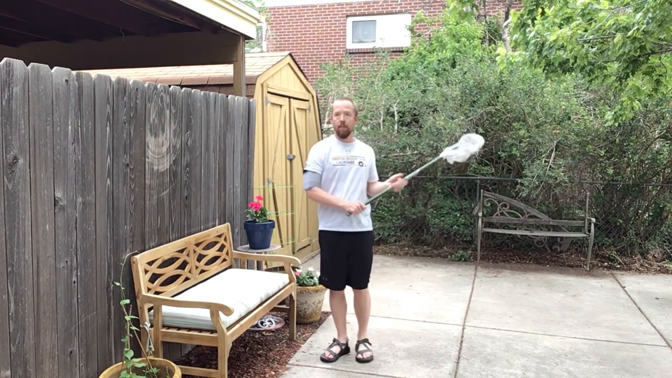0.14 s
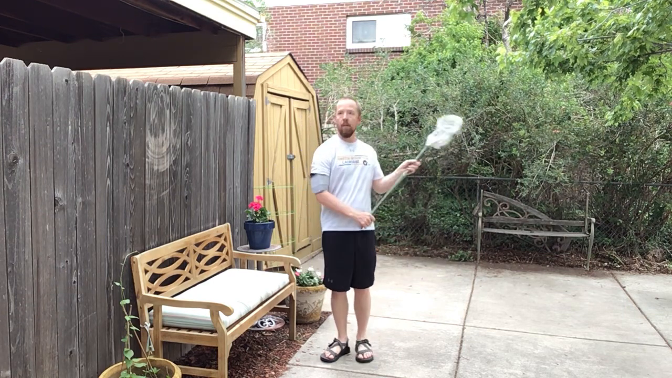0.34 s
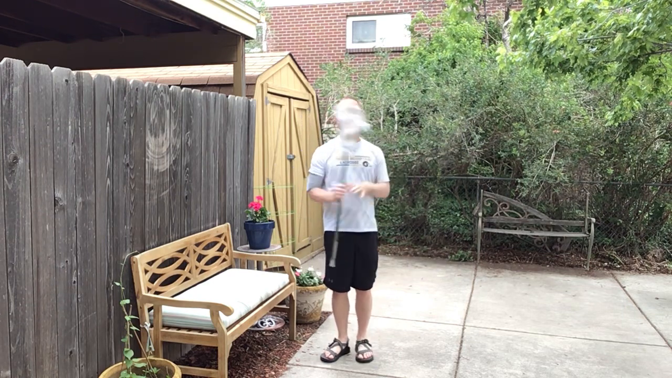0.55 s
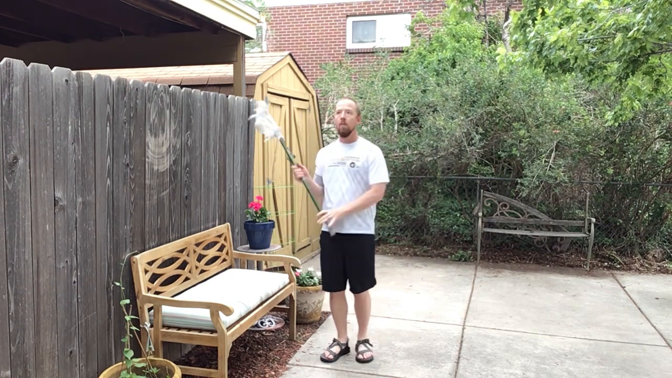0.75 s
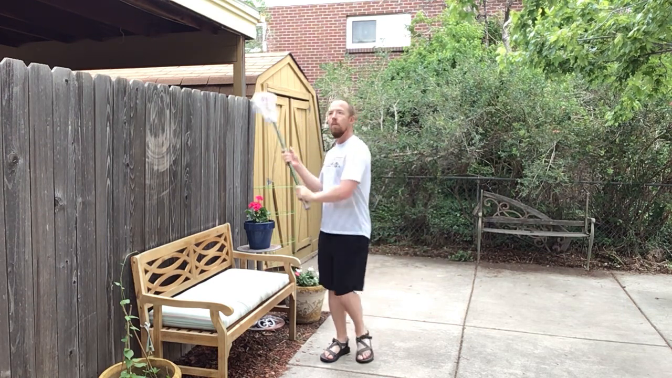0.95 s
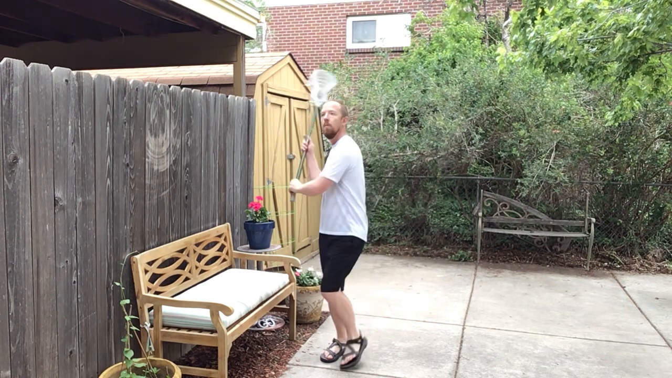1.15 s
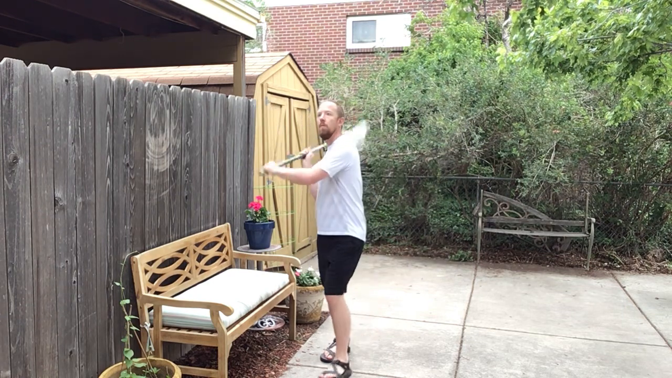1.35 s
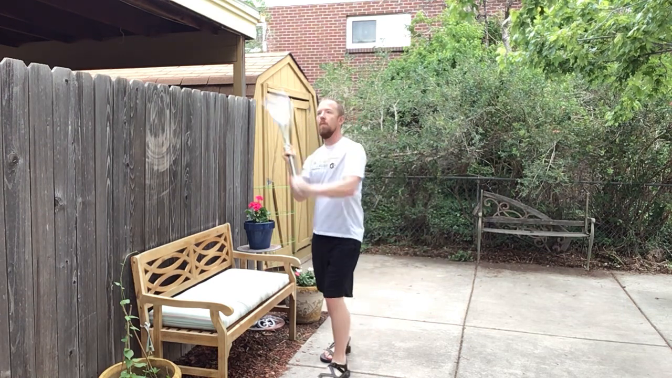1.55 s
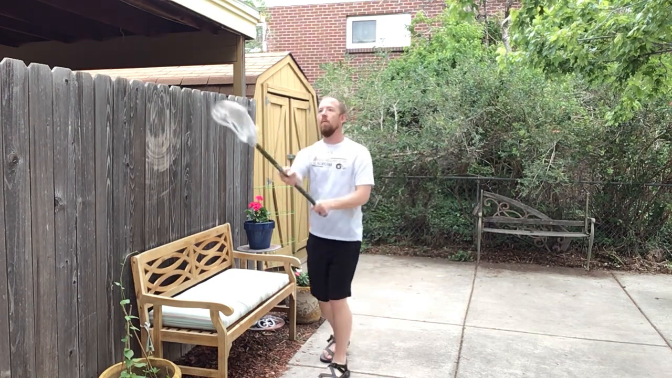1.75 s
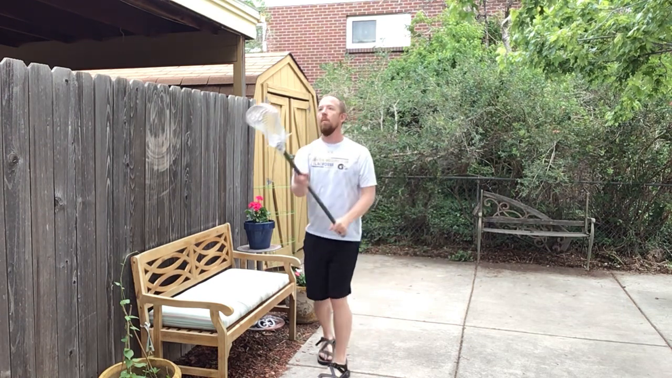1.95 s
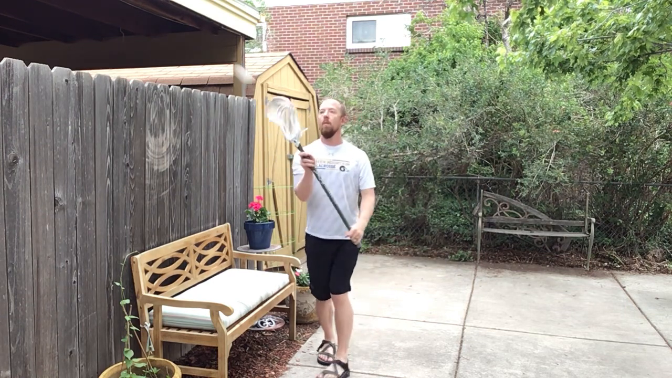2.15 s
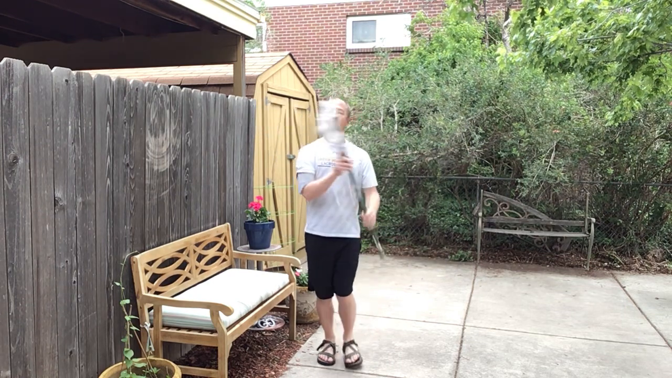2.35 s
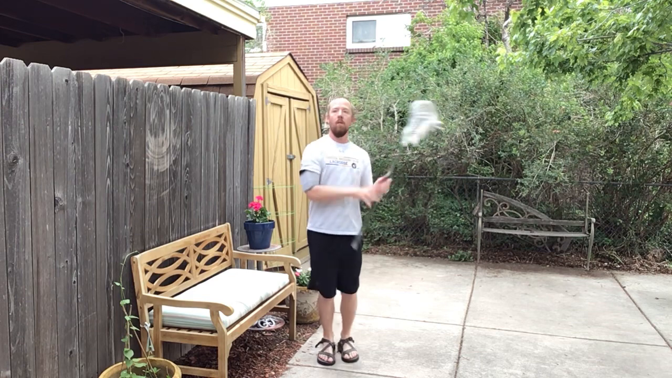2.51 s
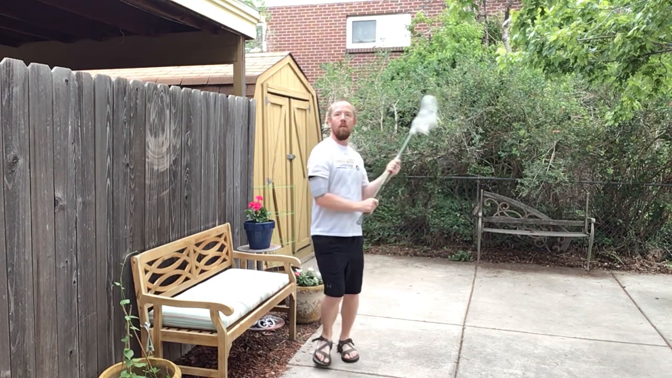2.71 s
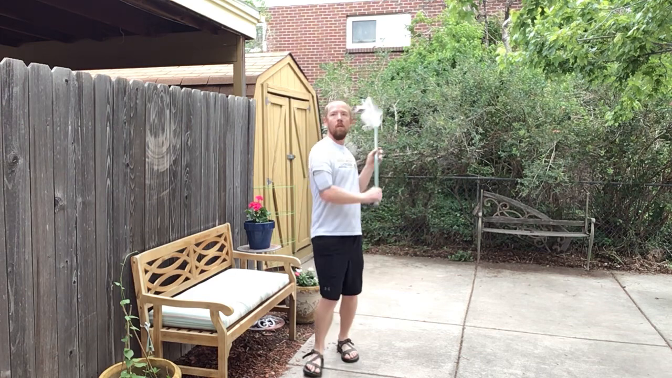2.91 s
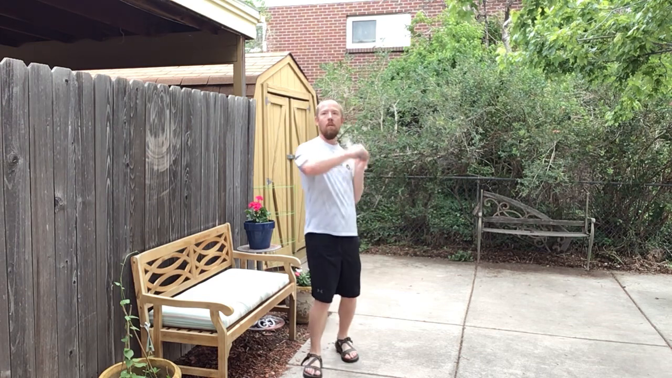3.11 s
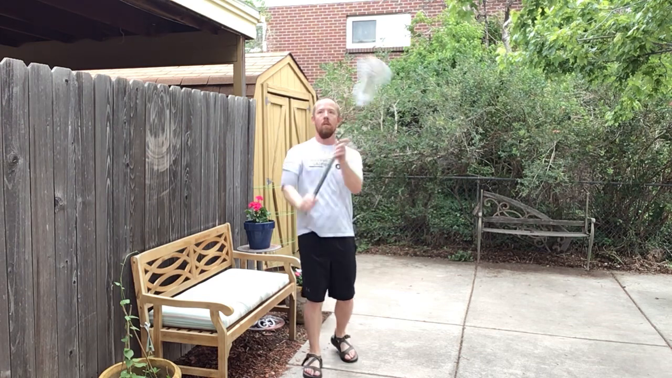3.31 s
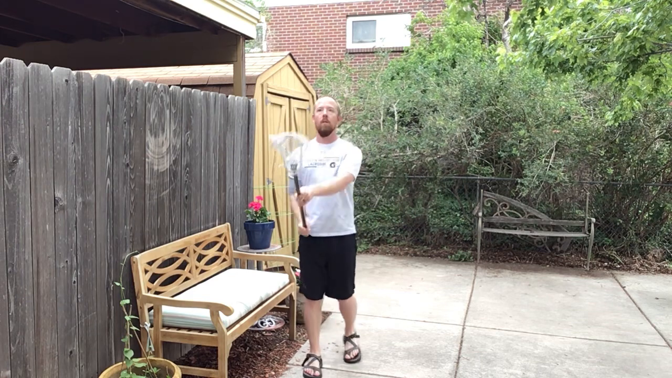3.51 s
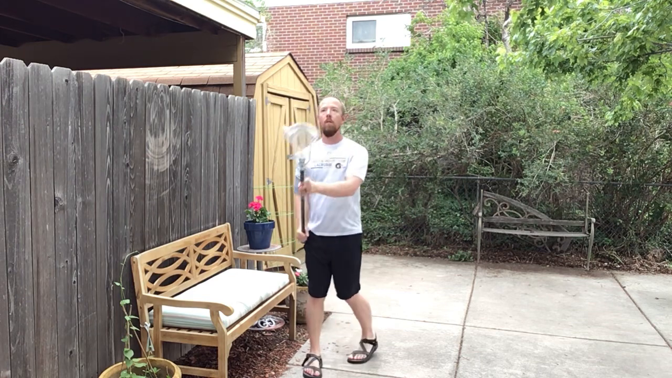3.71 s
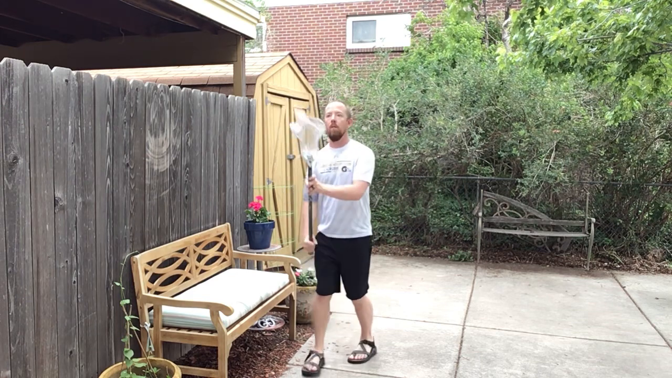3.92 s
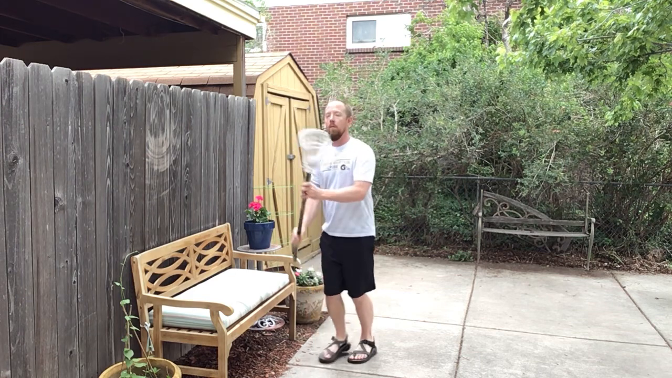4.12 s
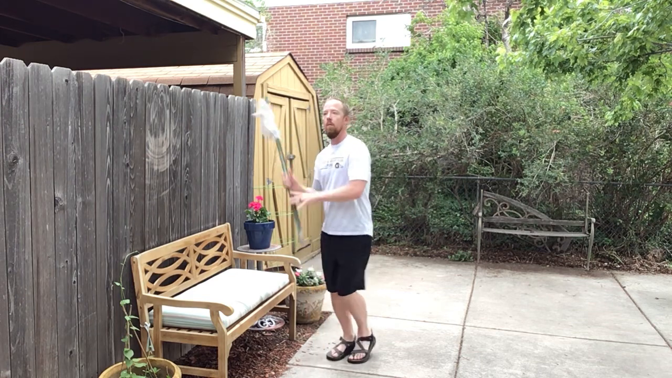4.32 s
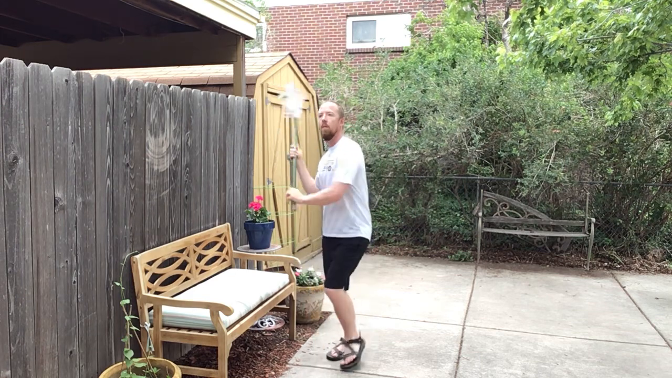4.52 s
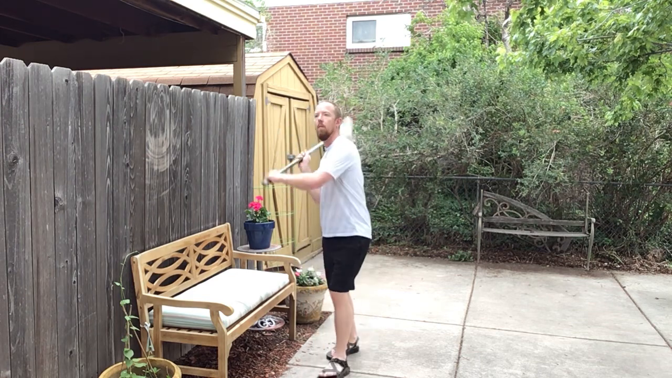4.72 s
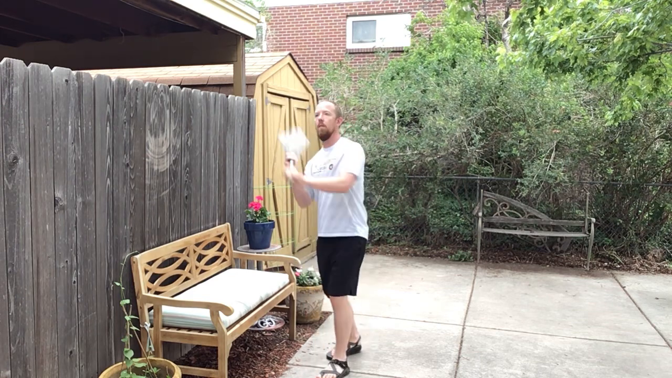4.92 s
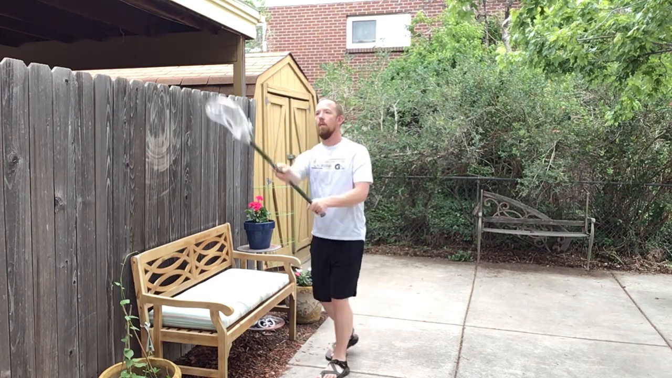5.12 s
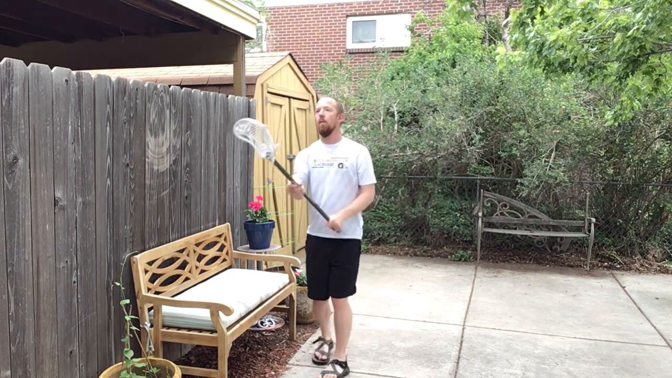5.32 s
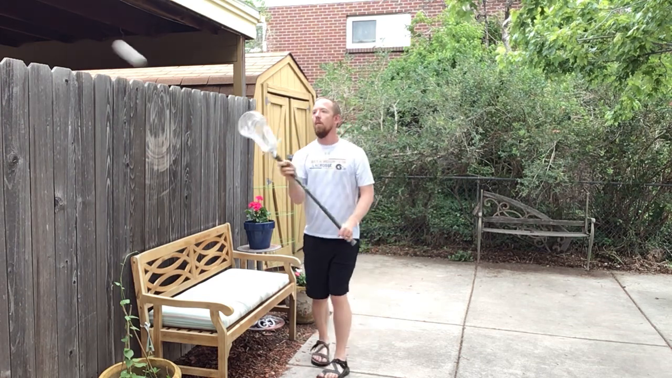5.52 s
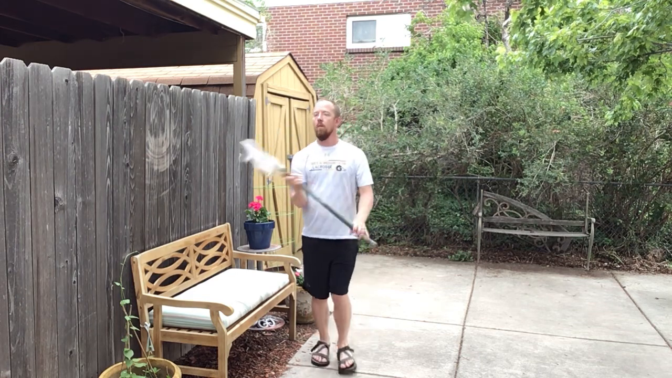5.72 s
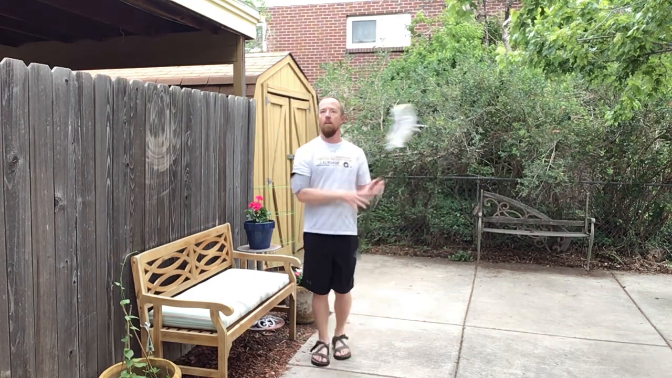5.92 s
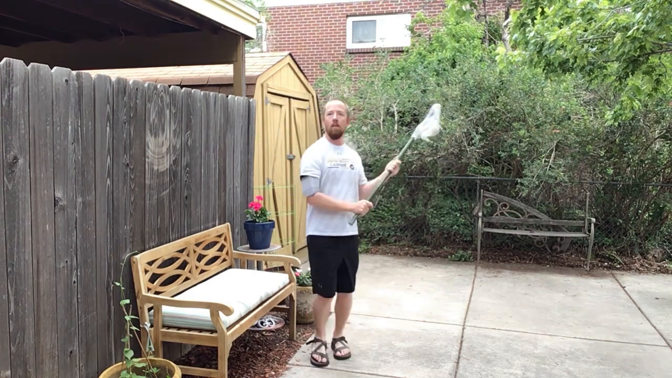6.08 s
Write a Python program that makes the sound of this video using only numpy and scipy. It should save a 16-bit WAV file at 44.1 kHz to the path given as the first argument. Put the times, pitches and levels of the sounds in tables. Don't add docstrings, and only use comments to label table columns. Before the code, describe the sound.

Three evenly spaced ball smacks on hollow wooden boards ring out in a yard, between soft net rattles, faint swishes and distant town rumble.

```python
import sys
import numpy as np
from scipy import signal
from scipy.fft import rfft, irfft
from scipy.io import wavfile

SR = 44100
rng = np.random.default_rng(int(sys.argv[2]) if len(sys.argv) > 2 else 0)


def persist_wave(psi):
    counts = np.round(np.clip(psi, -1, 1) * 32767).astype(np.int16)
    wavfile.write(sys.argv[1], SR, np.atleast_2d(counts).T)


def natural_amplitude(level_db):
    exponent = np.asarray(level_db, float) / 20
    return 10 ** exponent


N = 271215

# start in seconds, delay of the strongest push in seconds, lag of the bass in seconds,
# yard tail level in dB, tail tilt in dB per octave.
WALL_HITS = [
    (1.885, 0.011, 0.013, -45, -1.2),
    (3.623, 0.015, 0.0221, -46.5, 0.7),
    (5.302, 0.00956, 0.0226, -48, -0.24),
]
# pitch in Hz, T60 in seconds,
# then level in dB at hits 1, 2 and 3.
FRAME_MODES = [(70, 0.92, -14, -16, -13), (81.7, 0.48, -29, -6.5, -16), (95, 0.18, 2.5, -3, 6.5),
               (110.3, 0.55, -14.5, -8, -9), (118.6, 0.96, -20, -15, -21.5), (129.3, 0.37, -8.5, 1, -2.5),
               (152, 0.44, 7.5, 4.5, 9), (174, 0.29, -11, 3, -3)]
# pitch in Hz, T60 in seconds, then level in dB at hits 1, 2 and 3.
BOARD_MODES = [(184, 0.3, 8, 4.5, 4.5), (216.6, 0.49, -26, -26, -12), (232, 0.34, -10, -0.5, 2),
               (240.2, 0.25, 6.5, -8, -14), (257.1, 0.3, 2.5, -3.5, -19), (283.1, 0.29, 1.5, 4.5, 1.5),
               (298, 0.24, -14, -3.5, -10), (335.3, 0.33, -27, -22, -17.5), (348.6, 0.32, -6.5, -1, -9.5),
               (340, 0.088, -25, -23, -31),
               (396.5, 0.293, -12, -12.5, -10), (405, .25, -25, -20, -34), (407, 0.075, -22, -26, -32),
                (443, 0.5, -28, -25, -35), (480.5, 0.2, -24, -14, -36), (508.6, 0.2, -25, -24, -17.5),
                (554, 0.093, -20.5, -26, -18), (567, 0.25, -32, -30, -32), (592, 0.34, -24, -28, -28),
                (632, 0.24, -32, -47, -33), (697, 0.21, -31, -26, -28)]
# delay in seconds, level in dB.
YARD_ECHOES = [(.036, -6.5), (.069, -15.5)]
# start in seconds, peak in dB,
# low edge in Hz, high edge in Hz.
SLAP_CRACKS = [(1.8858, -37, 2500, 15000), (1.8872, -38, 700, 8000), (1.8903, -45, 8000, 15000),
               (1.8943, -46, 2000, 15000), (3.6242, -26, 6500, 12500), (3.6261, -29, 900, 6000),
               (3.6264, -35, 6000, 15000), (3.6293, -38, 8000, 15000), (3.6348, -41, 1800, 7000),
               (3.6378, -43, 2000, 8000), (5.3023, -36, 2000, 15000), (5.3035, -33, 7500, 14500),
               (5.3065, -35, 1500, 9000), (5.304, -36, 1200, 4500), (5.3112, -43, 2000, 15000)]
# frequency in Hz, level in dB per Hz.
TAIL_SPECTRUM = [(290, -27), (500, -3), (1200, -18), (1510, -19), (2950, -23), (3260, -26), (3820, -26),
                 (5860, -29), (15300, -26)]
# frequency in Hz, T60 in seconds.
TAIL_DECAY = [(500, 0.34), (800, 0.43), (1200, 0.38), (2000, 0.19), (2900, 0.24), (7700, 0.34),
              (15000, 0.16)]
# start in seconds, rms in dB, T60 in seconds.
MESH_RUBS = [(.065, -69, .05), (.765, -71, .07), (1.621, -65.5, 0.076), (1.70, -75, .06),
             (2.22, -60.5, 0.16), (2.426, -63, 0.18), (3.968, -57.5, 0.11), (3.995, -50, .07),
             (4.014, -54.5, .15), (4.294, -58.5, .11), (4.868, -68, .06), (4.889, -66, .13),
             (5.661, -61, 0.058), (5.667, -54, 0.062), (5.674, -60.5, 0.15), (5.903, -62.5, 0.1),
             (6.072, -66, .065)]
# start in seconds, peak in dB, pitch in Hz.
DULL_KNOCKS = [(1.887, -38, 580), (2.222, -52, 4300), (2.369, -59, 4040), (2.427, -58, 5000),
               (3.6258, -34.5, 540), (3.968, -43, 2480), (3.9705, -48, 2330), (3.971, -45, 510),
               (3.974, -41, 1400), (3.985, -43.5, 786), (3.995, -44, 7000), (3.998, -37, 5800),
               (4.015, -39, 6500), (4.019, -47, 8000), (4.167, -53, 3800), (4.294, -58, 6400),
               (4.295, -47, 400), (5.303, -45, 840), (5.668, -52, 930), (5.668, -42, 3580),
               (5.69, -45, 178), (5.889, -50, 520), (5.890, -52, 1000)]
# start in seconds, peak in dB, pitch in Hz.
HEAD_RINGS = [(.309, -60, 4470), (.32, -64, 3800), (2.371, -52, 4490), (2.38, -66, 3900),
              (4.297, -60, 4450), (5.672, -48, 4210)]
# moment of full speed in seconds, rms in dB,
# time speeding up in seconds, time held in seconds.
AIR_STROKES = [(.294, -79, .2, .005), (.46, -75, 0.096, .075), (2.07, -79, .2, .02), (2.3, -80, .1, .08),
               (2.44, -73, .2, .005), (2.566, -76, .03, .03), (4.0, -70, 0.075, 0.033),
               (4.2, -72, 0.33, 0.016), (4.3, -81, .015, 0.13), (5.514, -78, .25, .01),
               (5.69, -78, .04, .23), (6.018, -78, .03, .02)]
# start in seconds, rms in dB.
STRING_WHISTLES = [(1.965, -77), (2.32, -82), (4.1, -75), (5.79, -80)]
# start in seconds, rms in dB, centre in Hz, T60 in seconds.
BRIEF_SCUFFS = [(.059, -61, 1900, .054), (.307, -69, 4380, .05), (1.012, -69, 6000, 0.11),
                (1.025, -67, 1700, .05), (1.123, -65, 3300, .05), (1.545, -68.5, 4570, .06),
                (2.222, -63.5, 2400, .1), (2.233, -59.5, 1300, 0.047), (2.428, -61, 4200, 0.18),
                (2.444, -60, 2000, .09), (3.078, -65, 3000, 0.056), (3.14, -72, 2600, .08),
                (3.967, -52.5, 2300, .08), (3.968, -54.5, 726, 0.18), (4.165, -63, 3970, 0.15),
                (4.168, -59.5, 724, .043), (4.181, -63, 3900, .15), (4.204, -63.5, 3260, .06),
                (5.004, -64.5, 5400, .07), (5.552, -62, 2300, 0.075), (5.566, -62, 2480, 0.13),
                (5.666, -55.5, 590, 0.063), (5.666, -58.5, 1710, .05), (5.68, -67.5, 3900, 0.28),
                (5.897, -61, 3320, 0.17)]
# start in seconds, rms in dB, centre in Hz, T60 in seconds.
SOLE_DRAGS = [(1.249, -69, 4100, 0.41), (1.36, -69.5, 2600, .15), (4.72, -74, 3480, 0.1),
              (4.85, -72, 2980, 0.6)]
# start in seconds, length in seconds, start pitch in Hz, end pitch in Hz, rms in dB.
BIRD_NOTES = [(0.197, .09, 7850, 7900, -91), (.37, 0.044, 3480, 3620, -88), (0.41, .1, 3680, 3600, -80.5),
              (0.518, .06, 3600, 3660, -87), (0.68, 0.055, 3440, 3580, -80),
              (0.732, 0.053, 3560, 3550, -83), (.79, 0.078, 3560, 3500, -87),
              (0.697, 0.123, 6900, 6800, -83), (.74, .04, 6600, 6600, -92)]
# frequency in Hz, level in dB per Hz.
TOWN_SPECTRUM = [(28, -34), (47, -5.5), (112, 0.5), (139, -8.5), (165, -1.5), (190, -9.5), (215, -1),
                 (242, -11), (280, -4), (309, -13.5), (443, -14.5), (735, -21.5), (791, -22), (3610, -32.5),
                 (15000, -43.5)]


def at_hz(points, hz):
    table = np.array(points)
    return np.interp(np.log(hz), np.log(table[:, 0]), table[:, 1])


def rms_one(x):
    return x / np.sqrt(np.mean(x ** 2) + 1e-20)


def add(out, s, piece):
    i = round(s * SR)
    out[i:i + len(piece)] += piece[:N - i]


def band(x, low_hz, high_hz):
    edges = [low_hz, min(high_hz, .45 * SR)]
    return signal.sosfilt(signal.butter(3, edges, "band", fs=SR, output="sos"), x)


def soften(x, hz):
    return signal.sosfilt(signal.butter(1, hz, fs=SR, output="sos"), x)


def below(x, hz):
    return signal.sosfilt(signal.cheby2(14, 60, hz, fs=SR, output="sos"), x)


def coloured(spectrum, size):
    hz = np.maximum(np.fft.rfftfreq(size, 1 / SR), 1)
    white = rfft(rng.standard_normal(size))
    return rms_one(irfft(white * natural_amplitude(at_hz(spectrum, hz)), size))


def drift(rate):
    knots = rng.standard_normal(N // 400)
    r = np.exp(-800 * np.pi * rate / SR)
    slow = signal.lfilter([1], [1, -2 * r, r * r], knots)
    return np.interp(np.arange(N) / 400, np.arange(len(slow)), rms_one(slow))


def grainy(size, spread_db):
    grain_db = spread_db * np.minimum(rng.exponential(1, size), 4)
    return rms_one(rng.standard_normal(size) * natural_amplitude(grain_db))


def burst(level_db, low_hz, high_hz, rise_s, t60):
    t = np.arange(SR // 4) / SR
    rise = np.minimum(t / max(rise_s, 1e-4), 1)
    decay = natural_amplitude(-60 * np.maximum(t - rise_s, 0) / t60)
    grains = rms_one(band(grainy(len(t), spread_db=5.0), low_hz, high_hz))
    return natural_amplitude(level_db) * rise * decay * grains


def boards():
    out, t = np.zeros(N), np.arange(SR // 2) / SR
    boom_db, frame_top_hz = -31.5, 176
    for k, (s, push_s, lag_s, _, _) in enumerate(WALL_HITS):
        boom = np.zeros(len(t))
        for hz, t60, *strike_db in FRAME_MODES + BOARD_MODES:
            turns = hz * (t - push_s) + lag_s * (np.sqrt(hz) - np.sqrt(250)) ** 2
            swell = 1 - np.exp(-(t * hz / 1.22) ** 2)
            swell *= np.sign(hz - frame_top_hz)
            level = natural_amplitude(boom_db + strike_db[k] - 60 * t / t60)
            boom -= level * swell * np.sin(2 * np.pi * turns)
        add(out, s, boom)
        for lag, echo_db in YARD_ECHOES:
            add(out, s + lag, natural_amplitude(echo_db) * boom)
    return out


def slaps():
    out, t = np.zeros(N), np.arange(300) / SR
    pulse = (t / .0003) * np.exp(-t / .0003)
    for s, peak_db, low_hz, high_hz in SLAP_CRACKS:
        crack = band(rng.standard_normal(len(t)) * pulse, low_hz, high_hz)
        add(out, s, natural_amplitude(peak_db - 1.0) * crack / np.abs(crack).max())
    return out


def yard_tail():
    out, t = np.zeros(N), np.arange(SR // 2) / SR
    edges = 450 * 2 ** np.arange(0, 5.6, .5)
    shape = (1 + 1.1 * np.exp(-t / 0.018)) * (1 - np.exp(-t / 0.00053))
    for s, _, _, tail_db, tilt_db in WALL_HITS:
        noise = coloured(TAIL_SPECTRUM, size=len(t)) * shape
        for low, high in zip(edges, edges[1:]):
            t60 = at_hz(TAIL_DECAY, np.sqrt(low * high))
            dying_db = tail_db + tilt_db * np.log2(low / 450) - 60 * t / t60
            add(out, s, band(noise, low, high) * natural_amplitude(dying_db))
    return out


def mesh_rubs():
    out = np.zeros(N)
    for s, db, t60 in MESH_RUBS:
        dull_hz = min(6570 * 2 ** ((db + 62) / 9.5), .45 * SR)
        grains = burst(db + 3, 2300, 14000, rise_s=0.0014, t60=t60)
        add(out, s, soften(grains, dull_hz))
    return out


def tap(peak_db, hz, t60):
    t = np.arange(SR // 10) / SR
    ring = natural_amplitude(peak_db - 60 * t / t60) * np.minimum(t * hz / 0.87, 1)
    rattle = rms_one(band(rng.standard_normal(len(t)), .8 * hz, 1.3 * hz))
    return ring * (np.sin(2 * np.pi * hz * t) + .4 * rattle)


def knocks():
    out = np.zeros(N)
    for s, peak_db, hz in DULL_KNOCKS:
        cycles = 13.3 * (hz / 1000) ** 0.19
        add(out, s, tap(peak_db, hz, cycles / hz))
    return out


def head_rings():
    out = np.zeros(N)
    for s, peak_db, hz in HEAD_RINGS:
        add(out, s, tap(peak_db, hz, t60=0.028))
    return out


def swish():
    t, gain = np.arange(N) / SR, 0
    for s, db, build_s, hold_s in AIR_STROKES:
        rising_db = -32 * np.maximum(s - t, 0) / max(build_s, 1e-3)
        falling_db = -250 * np.maximum(t - s - hold_s, 0)
        gain = gain + natural_amplitude(db + rising_db + falling_db)
    return gain * rms_one(band(rng.standard_normal(N), 9000, 15600))


def string_whistles():
    out, centre_hz, width_hz = np.zeros(N), 13350, 700
    for s, db in STRING_WHISTLES:
        low_hz, high_hz = centre_hz - width_hz / 2, centre_hz + width_hz / 2
        add(out, s, burst(db, low_hz, high_hz, rise_s=.022, t60=.3))
    return out


def rub_layer(rows, octaves, rise_s):
    out, half = np.zeros(N), 2 ** (octaves / 2)
    for s, db, hz, t60 in rows:
        add(out, s, burst(db, hz / half, hz * half, rise_s, t60))
    return out


def scuffs():
    return rub_layer(BRIEF_SCUFFS, octaves=1.38, rise_s=0.0039)


def drags():
    return rub_layer(SOLE_DRAGS, octaves=1.6, rise_s=0.026)


def birds():
    out, waver_hz = np.zeros(N), 30 * drift(25)
    for s, length, start_hz, end_hz, level_db in BIRD_NOTES:
        u = np.linspace(0, 1, round(length * SR))
        glide_hz = start_hz + (end_hz - start_hz) * np.sqrt(u)
        hz = glide_hz + waver_hz[round(s * SR):][:len(u)]
        whistle = np.sin(2 * np.pi * np.cumsum(hz) / SR)
        add(out, s, natural_amplitude(level_db + 7) * np.sin(np.pi * u) ** 0.26 * whistle)
    return out * natural_amplitude(3 * drift(30))


def town():
    noise = coloured(TOWN_SPECTRUM, size=N)
    lows = soften(noise, 400)
    highs = noise - lows
    return natural_amplitude(-57.5) * (lows * natural_amplitude(.8 * drift(1.5)) + highs * natural_amplitude(.45 * drift(3)))


def scene():
    wall = boards() + below(slaps(), 17100)
    stick = mesh_rubs() + knocks() + head_rings() + swish() + string_whistles()
    feet = scuffs() + drags()
    faint = below(yard_tail() + stick + feet, 16200)
    return (wall + faint + birds() + below(town(), 15550))[None]


def low_pass(x):
    return signal.sosfilt(signal.butter(12, 16680, fs=SR, output="sos"), x)


def record(dry):
    cut = signal.sosfilt(signal.butter(8, 45, "high", fs=SR, output="sos"), dry)
    return low_pass(cut)


dry = scene()
out = record(dry)
persist_wave(out)
```